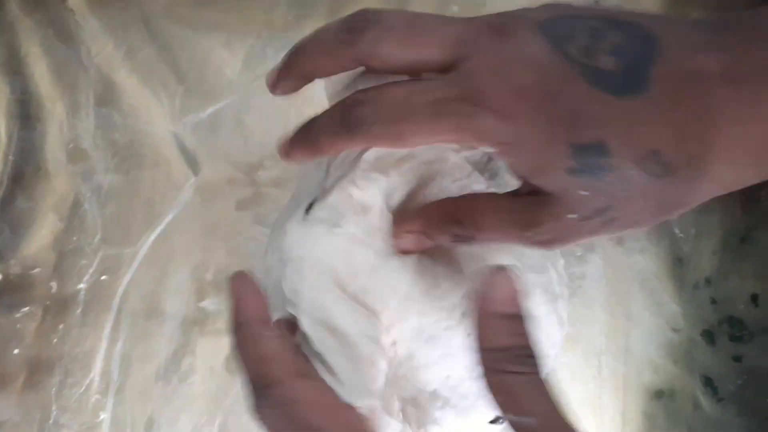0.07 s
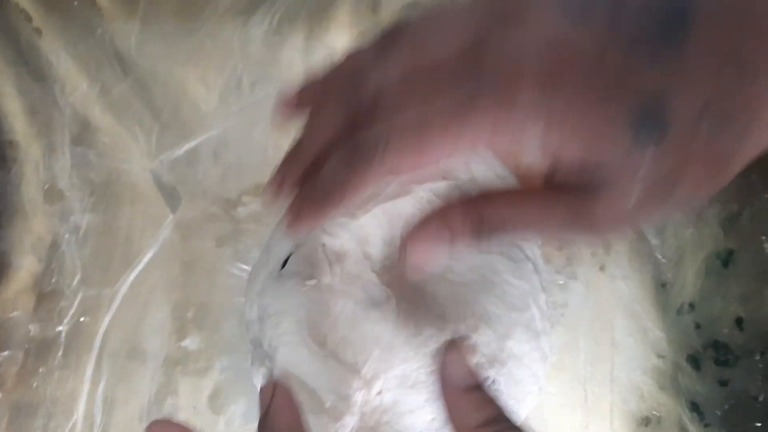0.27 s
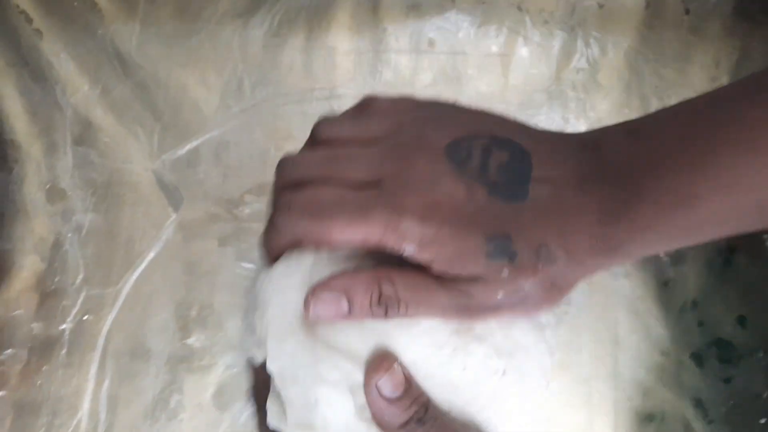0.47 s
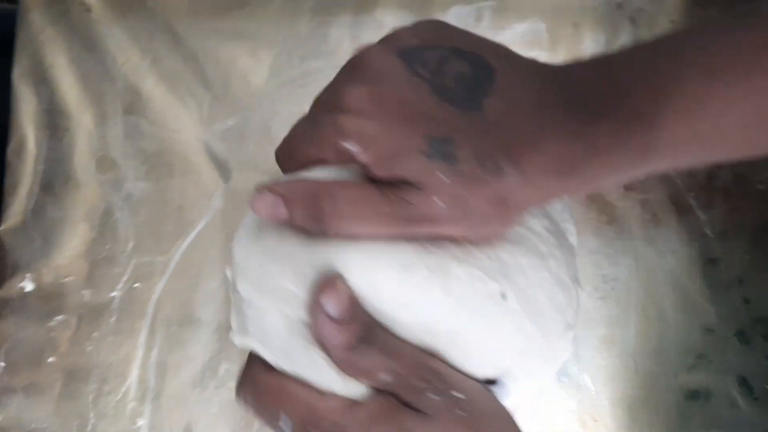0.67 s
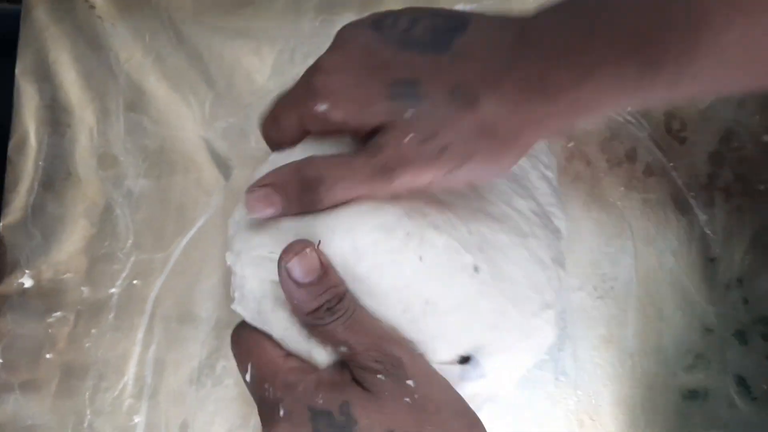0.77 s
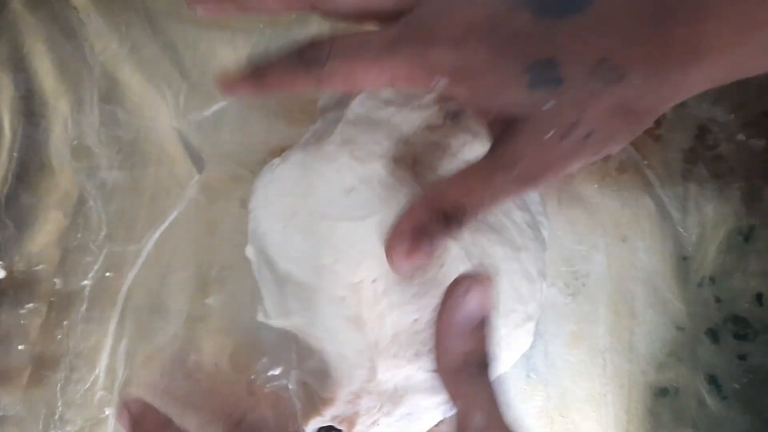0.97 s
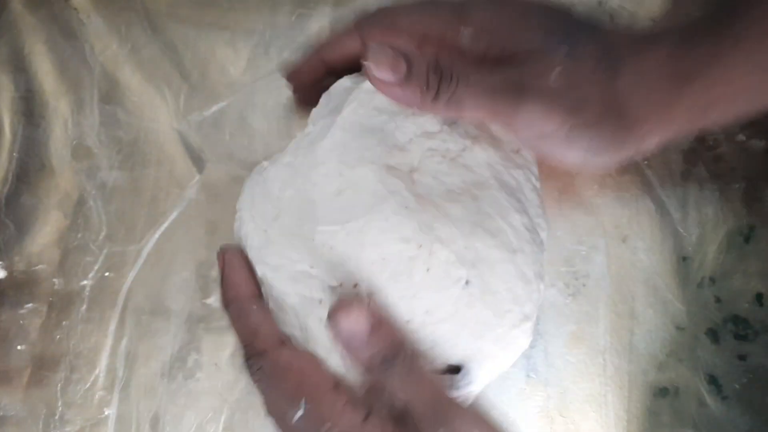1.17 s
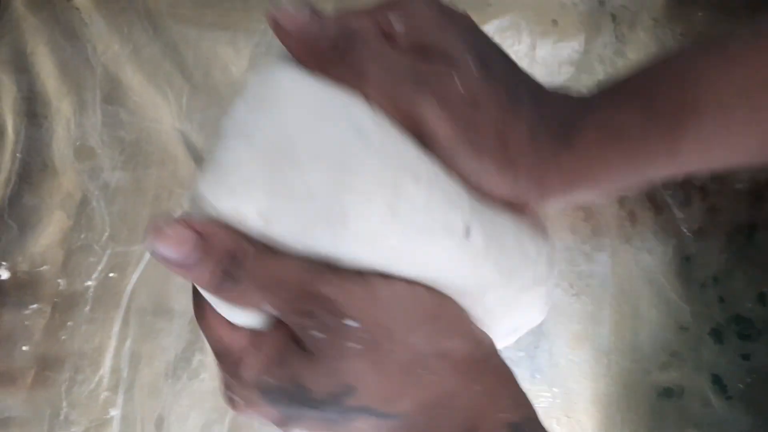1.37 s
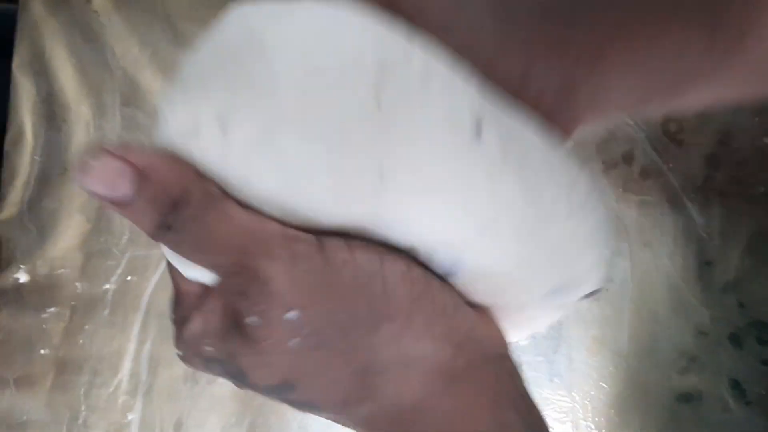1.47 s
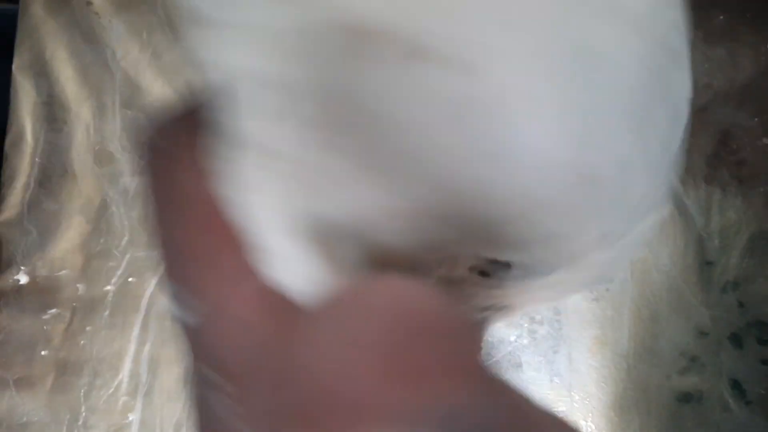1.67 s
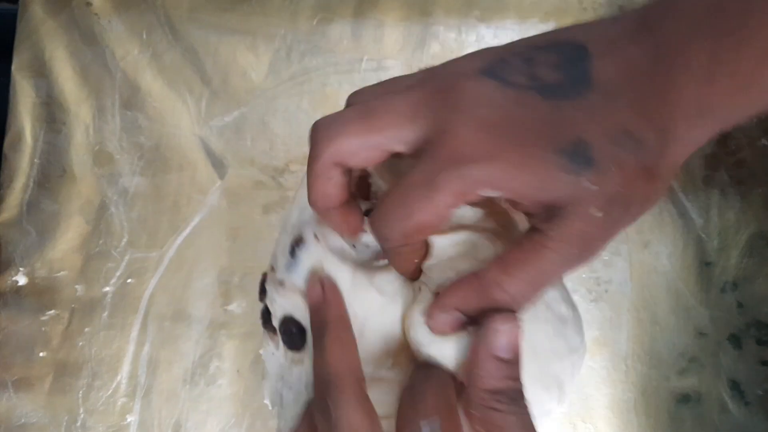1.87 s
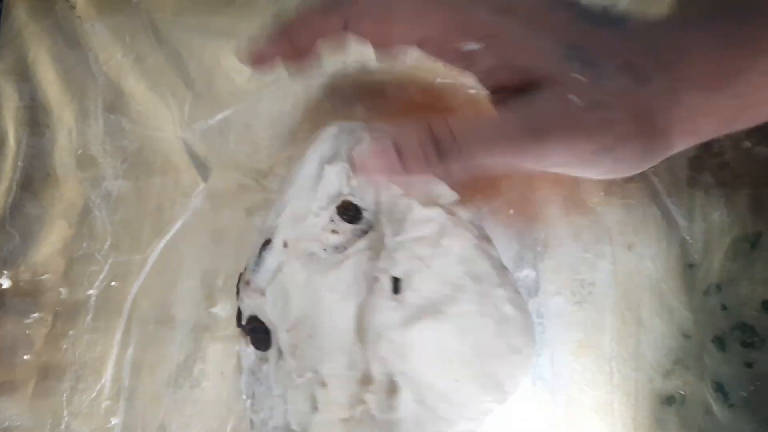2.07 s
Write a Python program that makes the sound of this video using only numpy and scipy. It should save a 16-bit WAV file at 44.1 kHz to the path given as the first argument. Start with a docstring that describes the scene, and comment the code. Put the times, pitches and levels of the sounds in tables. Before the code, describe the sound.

Kneading of soft dough on a plastic liner, close in a small, quiet room. A dull thud opens, then faint rubbing fades. Around 0.55-1.0 s the dough drags with short rubbery groans, a tick and a low thump at 0.74. Light bumps follow at 1.2. Near 1.5 it peels with crackle and a sharp crack; at 1.88 it slaps down heavily with a dull airy splat, then a pressing thump and rub at 1.96.

```python
"""A dull thud comes first: hands knead soft dough on a plastic liner in a small kitchen, heard close by.
The dough rubs and groans over the liner (stick-slip grains, wavering sines), is pressed down (low noise
and a drone), peels off with crackle, and is slapped back with a crack; sticky snaps and small ticks dot
the handling (noise bursts). Soft pulses ring the surface under the liner in a few modes; feedback
delays make the room, over a quiet room tone."""
import sys
import numpy as np
from scipy import signal
from scipy.fft import rfft, irfft, next_fast_len
from scipy.io import wavfile
from scipy.ndimage import uniform_filter1d

SR = 44100
rng = np.random.default_rng(int(sys.argv[2]) if len(sys.argv) > 2 else 0)


def store_wav(level_fs):
    """Save 16-bit WAV to argv[1]."""
    pcm = np.round(np.clip(np.atleast_2d(level_fs), -1, 1) * 32767)
    wavfile.write(sys.argv[1], SR, pcm.T.astype(np.int16))


N = 92918
T = np.arange(N) / SR  # time [s]


def from_db(db):
    """Decibels to gain."""
    return 10 ** (np.asarray(db) / 20)


def rms_one(x):
    """Scale to an rms of 1."""
    return x / np.sqrt(np.mean(x ** 2) + 1e-20)


def level(rows):
    """Gain over time, gliding in dB between (time [s], level [dB]) points."""
    return from_db(np.interp(T, *np.transpose(rows)))


def at_hz(points, hz):
    """Read a table on a log-frequency axis."""
    points = np.array(points)
    return np.interp(np.log(hz), np.log(points[:, 0]), points[:, 1])


def butter(x, hz, kind, order=2):
    """Butterworth filter."""
    sos = signal.butter(order, np.clip(hz, 10, .45 * SR), kind, fs=SR, output="sos")
    return signal.sosfilt(sos, x + 1e-18)


def pan(db):
    """Left and right gains for a level difference; positive is louder on the left."""
    return from_db(np.array([[db], [-db]]) / 2)


def fade(start, t60):
    """Envelope that jumps to 1 and falls by 60 dB in t60 seconds."""
    return (T >= start) * from_db(-60 * np.maximum(T - start, 0) / t60)


def ring(x, hz, t60):
    """One mode as a two-pole resonator: a unit click rings as a decaying sine of height 1."""
    radius = from_db(-60 / (t60 * SR))
    angle = 2 * np.pi * hz / SR
    return signal.lfilter([0, np.sin(angle)], [1, -2 * radius * np.cos(angle), radius * radius], x + 1e-18)


def noise_streams():
    """Four unrelated streams of white noise: two mid-side pairs."""
    return rng.standard_normal((2, 2, N))


def grains(per_s, spread_db, smooth):
    """Random tiny slips of uneven size over a share of smooth noise: four streams."""
    size = from_db(spread_db * np.minimum(rng.exponential(1, N), 4))
    clicks = (rng.random(N) < per_s / SR) * size * noise_streams()
    return rms_one(clicks) + smooth * noise_streams()


def evened(x, window_s):
    """Take the slow swings out of a noise, so that a steady hand makes a steady sound."""
    power = uniform_filter1d(np.mean(x ** 2, axis=0), max(int(window_s * SR), 8))
    return rms_one(x / np.sqrt(power + .1 * power.mean()))


# how alike left and right are: (frequency [Hz], likeness [0 to 1])
STEREO_LIKENESS = [(100, 0.95), (300, 0.86), (650, 0.19), (1300, 0.013)]


def coloured(streams, colour):
    """Shape the streams in 14 narrow bands into stereo, wider towards the treble; rms 1."""
    out = 0
    edges = np.geomspace(colour[0][0], colour[-1][0], 15)
    for k, (low, high) in enumerate(zip(edges, edges[1:])):
        mid, side = butter(streams[k % 2], [low, high], "band")
        hz = np.sqrt(low * high)
        alike = np.clip(at_hz(STEREO_LIKENESS, hz), -1, 1)
        stereo = np.sqrt(1 + alike) * mid + np.sqrt(1 - alike) * side * [[1], [-1]]
        out = out + from_db(at_hz(colour, hz)) * stereo
    return rms_one(out)


# room tone spectrum: (frequency [Hz], relative gain [dB])
ROOM_TONE_COLOUR = [(25, -4), (70, 13.5), (140, -1), (300, 6.5), (620, -18), (1200, -12), (15000, -43)]


def room_tone(level_db=-60):
    """Steady, quiet noise weighted towards the bass."""
    return from_db(level_db) * coloured(noise_streams(), ROOM_TONE_COLOUR)


ROOM_T60_S, ROOM_DELAY_S = 0.26, .0113  # decay, shortest path
ROOM_WIDE_HZ = 550  # above this the tail turns wide


def kitchen(x):
    """Short reverberation from feedback delays, alike on both sides in the bass."""
    size = next_fast_len(N + SR // 2)
    turn = -2j * np.pi * np.arange(size // 2 + 1) * SR / size  # phase per second of delay
    paths = ROOM_DELAY_S * np.geomspace(1, 3.87, 12)
    loops = [from_db(-60 * path / ROOM_T60_S) * np.exp(turn * path) for path in paths]
    combs = [(-1) ** (k // 2) * loop / (1 - loop) for k, loop in enumerate(loops)]
    sound = rfft(x.mean(axis=0), size)
    for path in (.0011, .0029, .0047):  # allpass delays [s] smear the echoes
        lag = np.exp(turn * path)
        sound = sound * (lag - .6) / (1 - .6 * lag)
    mid, side = (irfft(sound * sum(combs[k::2]), size)[:N] for k in (0, 1))
    tail = mid + butter(side, ROOM_WIDE_HZ, "high") * [[1], [-1]]
    return butter(tail, 5600, "low", order=1) / 2


# tacky skin and dough parting from the plastic: (time [s], level [dB])
TACK_LEVEL = [(0, -61.5), (.1, -61), (.41, -78), (.57, -58.5), (.72, -50), (.77, -59.5), (.93, -50),
              (1.04, -70.5), (1.18, -77.5), (1.22, -61.5), (1.29, -53), (1.38, -58.5), (1.44, -52),
              (1.52, -45), (1.59, -63), (1.67, -52.5), (1.72, -62.5), (1.885, -66), (1.96, -52), (2.1, -69)]
# fizz spectrum: (frequency [Hz], relative gain [dB])
TACK_SPECTRUM = [(1000, -6.5), (5500, -1), (7300, -6), (8300, 3.5), (9500, -11), (12000, -4), (15500, -5.5)]


def tack():
    """Fine sticky fizz of countless small contacts parting."""
    return level(TACK_LEVEL) * coloured(grains(per_s=1400, spread_db=-3.0, smooth=1.0), TACK_SPECTRUM)


# dragged dough grips and slips evenly for a moment:
# (time [s], length [s], pitch at full grip [Hz], level [dB])
GROAN_EVENTS = [(0.067, 0.31, 625, -53.5), (0.119, 0.051, 342, -45), (0.143, 0.13, 280, -50),
                (0.554, 0.037, 570, -35), (0.853, 0.11, 458, -44), (0.862, 0.145, 257.3, -40.5),
                (0.887, 0.066, 391.6, -43)]
GROAN_BEND, GROAN_JITTER, GROAN_FLUTTER = .03, .025, 0.44  # shares: pitch rise, pitch and level waver
GROAN_WAVER_HZ = 45  # lowpass limit of the wavering


def groans():
    """Short rubbery tones: pitch and level swell with the grip and waver as it slips."""
    out = 0
    for s, length, hz, db in GROAN_EVENTS:
        grip = np.sin(np.pi * np.clip((T - s) / length, 0, 1))
        jitter, flutter = rms_one(butter(rng.standard_normal((2, N)), GROAN_WAVER_HZ, "low"))
        pitch = hz * (1 + GROAN_BEND * (grip - 1) + GROAN_JITTER * jitter)
        tone = np.sin(2 * np.pi * np.cumsum(pitch) / SR)
        out = out + from_db(db) * grip * (1 + GROAN_FLUTTER * flutter) * tone
    return out


# modes of the surface under the liner: (frequency [Hz], level [dB], t60 [s])
SURFACE_MODES = [(82.9, -30, 0.24), (124.4, -24.5, 0.13), (163, -25.5, 0.07), (292, -37, 0.018),
                 (297.1, -15, 0.19), (341.8, -15.5, 0.091), (364, -28.5, 0.071), (457, -20, 0.049),
                 (637, -26, 0.14), (631.4, -14.5, 0.019), (842, -42, 0.11), (1170, -23, 0.078)]


def surface(push):
    """The surface rings in all its modes."""
    return sum(from_db(db) * ring(push, hz, t60) for hz, db, t60 in SURFACE_MODES)


# dough sliding over the liner: (time [s], level [dB])
SLIDE_LEVEL = [(0, -57), (.09, -58), (.16, -51), (.29, -51), (.41, -68), (.505, -60), (.533, -41.5),
               (.565, -37), (.61, -39), (.71, -34.5), (.78, -49), (.84, -48), (.9, -41), (.97, -48),
               (1.08, -67.5), (1.38, -63), (1.5, -38.5), (1.58, -55.5), (1.86, -71.5), (1.95, -38),
               (2.1, -50)]
# rubbing spectrum: (frequency [Hz], relative gain [dB])
SLIDE_SPECTRUM = [(100, -18), (220, -2), (310, 4), (480, -1), (680, 1), (1050, -8), (1500, -14.5),
                  (3000, -32)]


def sliding(body_db=-4, body_low_hz=480):
    """Dense stick and slip of dough on plastic, partly ringing the surface."""
    rub = coloured(grains(per_s=1400, spread_db=1.5, smooth=0.6), SLIDE_SPECTRUM)
    body = rms_one(surface(butter(rub, body_low_hz, "high")))
    return level(SLIDE_LEVEL) * evened(rub + from_db(body_db) * body, window_s=0.052)


# weight of the hands on the dough: (time [s], level before the rumble and drone trims [dB])
PRESS_WEIGHT = [(0, -40), (.07, -57.5), (.16, -51), (.41, -63), (.68, -52), (.75, -35), (.83, -41.5),
                (.95, -34.5), (1.03, -43), (1.17, -57), (1.31, -41), (1.39, -57.5), (1.5, -38), (1.58, -53),
                (1.855, -65), (1.96, -25.5), (2.1, -42.5)]
# rumble spectrum: (frequency [Hz], relative gain [dB])
PRESS_SPECTRUM = [(25, -16), (50, -3), (130, 8), (210, -20), (300, -1.5), (600, -54)]


def pressing(rumble_db=-3.0, drone_db=-4, drone_hz=175.74, drone_t60_s=0.42):
    """The weight of the hands makes the surface rumble and drone on one mode."""
    rumble = evened(coloured(noise_streams(), PRESS_SPECTRUM), window_s=0.011)
    drone = evened(ring(rng.standard_normal((1, N)), drone_hz, drone_t60_s), window_s=0.023)
    return level(PRESS_WEIGHT) * (from_db(rumble_db) * rumble + from_db(drone_db) * drone)


# resonances of the crinkling liner: frequency [Hz]
LINER_MODES = [1284, 2056, 2757, 3307, 3656, 4100]
LINER_T60_S = .06


def liner(x):
    """The thin plastic rings briefly at its resonances; as loud as what excites it."""
    rings = sum((-1) ** k * ring(x, hz, LINER_T60_S) for k, hz in enumerate(LINER_MODES))
    return rms_one(rings) * x.std()


# the liner crinkles as dough pulls at it, rise and fall being times to 1/e:
# (time of the height [s], level before trims and pan [dB], rise [s], fall [s])
PEEL_EVENTS = [(.24, -61, 0.14, 0.076), (0.951, -42, 0.0043, 0.017), (1.446, -43.5, 0.0089, 0.0063),
               (1.491, -42, 0.011, 0.014), (1.511, -46.5, 0.0063, 0.018), (1.954, -40, 0.003, 0.035)]
# crackle spectrum: (frequency [Hz], relative gain [dB])
PEEL_SPECTRUM = [(600, 4.5), (1200, 4.5), (1900, 3), (2700, 0.5), (4600, -4), (9000, -12), (15000, -38)]


def peels(crackle_db=-0.5, liner_db=-6.5):
    """Coarser crackle that swells and dies as the liner is pulled, ringing its resonances."""
    envelope = 0
    for s, db, rise, fall in PEEL_EVENTS:
        envelope = envelope + from_db(db) * np.exp(np.minimum((T - s) / rise, (s - T) / fall))
    crackle = coloured(grains(per_s=1900, spread_db=1.5, smooth=0.5), PEEL_SPECTRUM)
    return envelope * (from_db(crackle_db) * crackle + from_db(liner_db) * liner(crackle)) * pan(db=5)


# sticky snaps and small ticks; the last row is the crack of the slap:
# (time [s], level before a common trim [dB], pitch [Hz], t60 [s], left over right [dB])
SNAP_EVENTS = [(0.111, -42, 7600, 0.016, 4), (0.462, -52.5, 5500, 0.04, 10), (0.6215, -32, 6700, 0.01, -2),
               (1.229, -44, 4750, 0.017, 10), (1.281, -45.5, 5200, 0.026, -5),
               (1.4872, -30, 3800, 0.045, -3), (1.4895, -30, 3900, 0.013, 0),
               (1.5021, -18, 3180, 0.006, 9.5), (1.52, -24.5, 6560, 0.0074, 3),
               (1.829, -47.5, 9000, 0.0083, 16), (1.8731, -28, 10100, 0.013, -1)]
SNAP_Q, SNAP_SPRAY_DB, SNAP_TRIM_DB = 1.39, -9.5, -5.0  # pitch over bandwidth, broad spray, trim


def snaps():
    """Each snap, tick or crack is a short noise burst around its own pitch, with a broad spray."""
    out = 0
    for s, db, hz, t60, pan_db in SNAP_EVENTS:
        noise = rng.standard_normal((3, N))
        envelope = fade(s, t60)
        burst = (noise[:2] + 1.3 * noise[2]) * envelope  # the third noise is common to both sides
        tone = butter(burst, hz + np.array([-.5, .5]) * hz / SNAP_Q, "band")
        spray = butter(burst, 1200, "high")
        snap = rms_one(tone) + from_db(SNAP_SPRAY_DB) * rms_one(spray)
        out = out + from_db(db + SNAP_TRIM_DB) * pan(pan_db) * envelope.std() * snap
    return out


# dough spreads after a hard landing and squeezes air out: (time [s], level [dB], t60 [s])
SPLAT_EVENTS = [(1.201, -38, 0.49), (1.875, -20.5, 0.25)]
# squeezed air spectrum: (frequency [Hz], relative gain [dB])
SPLAT_SPECTRUM = [(60, -20), (130, -4), (320, 1.5), (480, -5), (660, -4), (900, -18.5), (3000, -42),
                  (8000, -38.5), (15000, -52)]


def splats():
    """A dull burst of trapped air follows each hard landing."""
    envelope = sum(from_db(db) * fade(s, t60) for s, db, t60 in SPLAT_EVENTS)
    air = evened(coloured(noise_streams(), SPLAT_SPECTRUM), window_s=0.0061)
    return butter(envelope, 180, "low", order=1) * air  # the lowpass softens the onset


# dough and hands bump the surface: (time [s], level of the push [dB], contact [ms])
BLOW_EVENTS = [(.008, -8, 11), (0.46, -37, 0.66), (0.739, 0, 12.5), (1.2039, -18.5, 2), (1.2243, -17, 1.32),
               (1.2393, -18, 1.31), (1.318, -23, 5.5), (1.471, -15, 3), (1.5001, -13, 2.53),
               (1.5192, -16, 0.81), (1.621, -24.5, 2.15), (1.8751, 0.5, 1.33), (1.882, -3.5, 1.53),
               (1.8905, -0.5, 1.71), (1.9022, -16, 1.36), (1.9563, -5, 4.6), (1.969, -0.5, 6.9)]


def blows():
    """Each landing is a soft push into the surface; longer contact sounds duller."""
    push = np.zeros(N)
    for s, db, contact_ms in BLOW_EVENTS:
        pulse = np.sin(np.pi * np.clip((T - s) / (contact_ms / 1000), 0, 1)) ** 2
        push += from_db(db) * pulse / pulse.sum()
    return butter(surface(push), 95, "high")


def scene():
    """Thuds, rubbing and sticky noises in the room, over its quiet tone."""
    thuds = blows()
    ticks = snaps()
    rub = sliding() + groans()
    crackle = peels()
    air = room_tone()
    to_room = from_db(-13.0) * thuds + from_db(-12.0) * ticks
    to_room = to_room + from_db(-16.5) * rub + from_db(-10.0) * crackle
    plastic = ticks + from_db(-19) * liner(ticks) + crackle  # the ticks ring the liner too
    return thuds + plastic + splats() + rub + pressing() + tack() + kitchen(to_room) + air


def record(dry):
    """The microphone loses the deepest bass and the top is cut steeply at 15.5 kHz."""
    top = signal.ellip(10, .1, 80, 15500, fs=SR, output="sos")
    return signal.sosfilt(top, butter(dry, 51, "high"))


dry = scene()
out = record(dry)
store_wav(out)
```